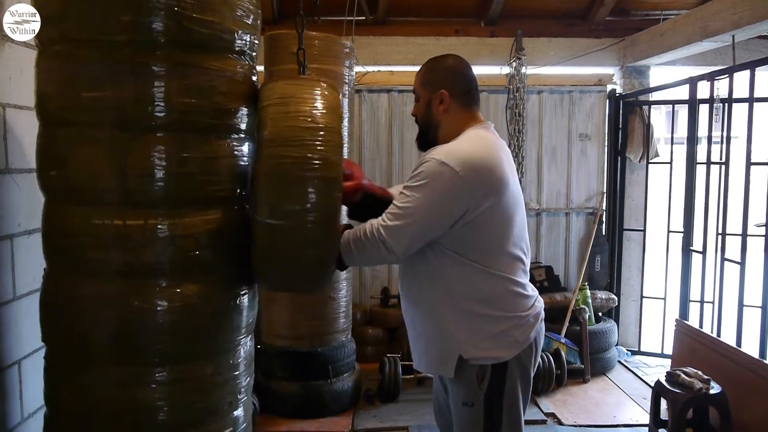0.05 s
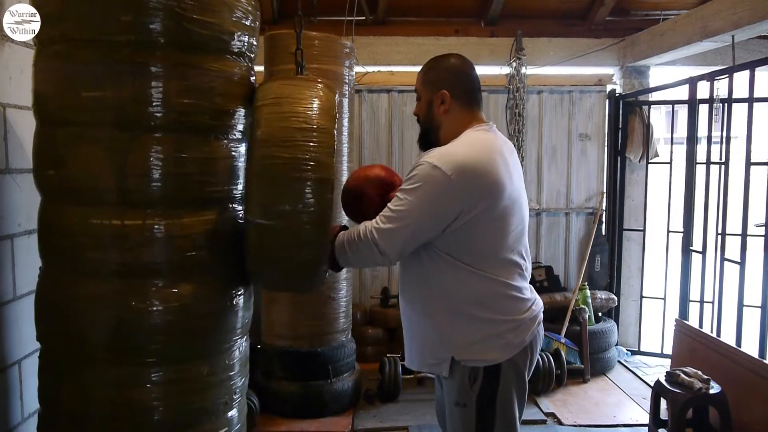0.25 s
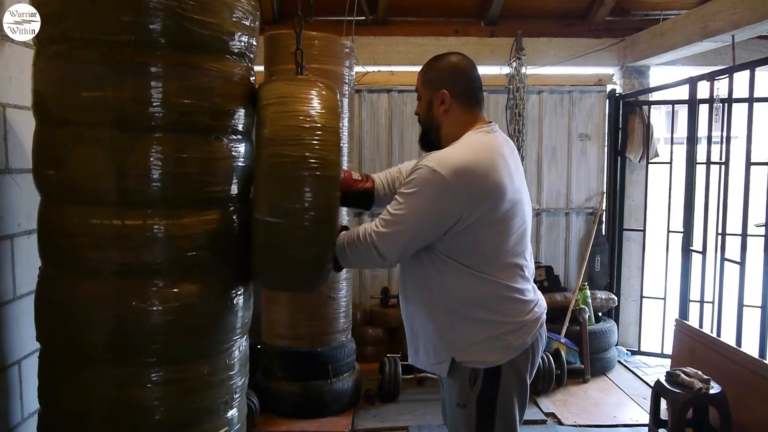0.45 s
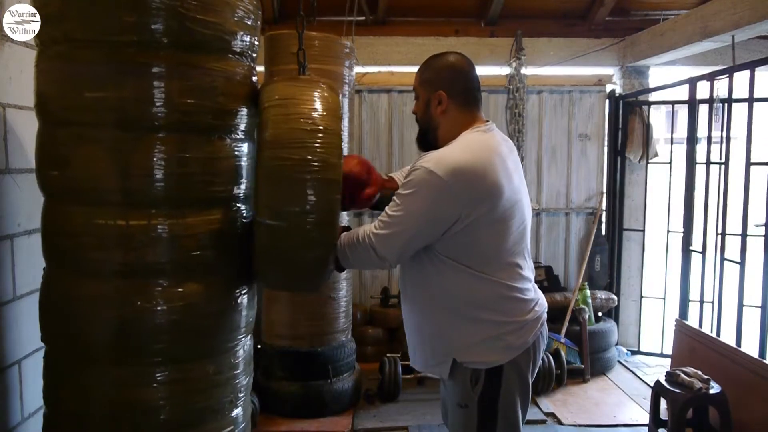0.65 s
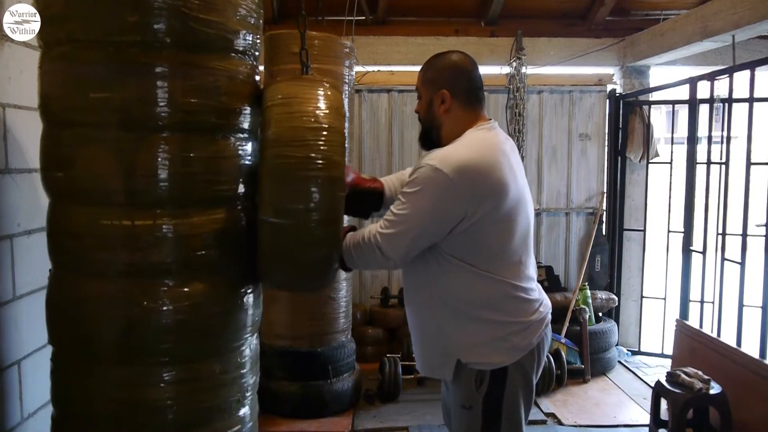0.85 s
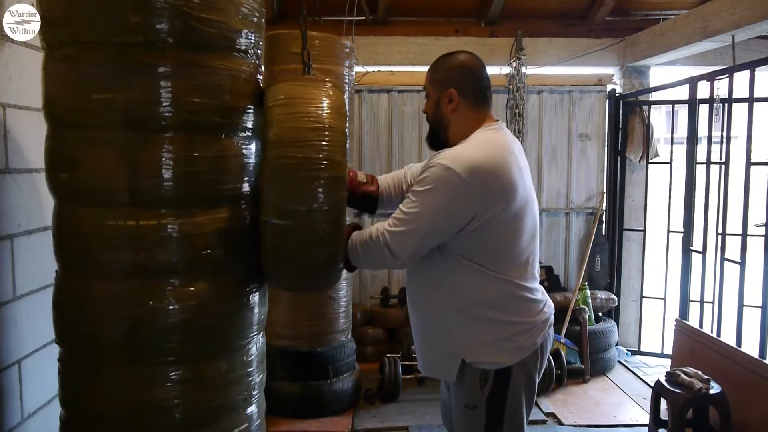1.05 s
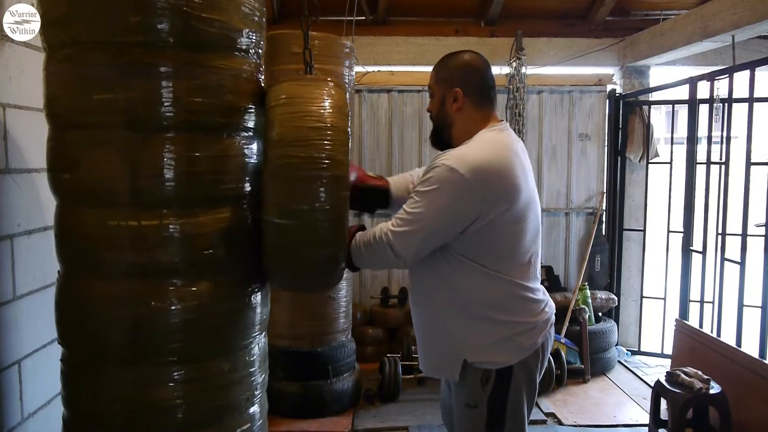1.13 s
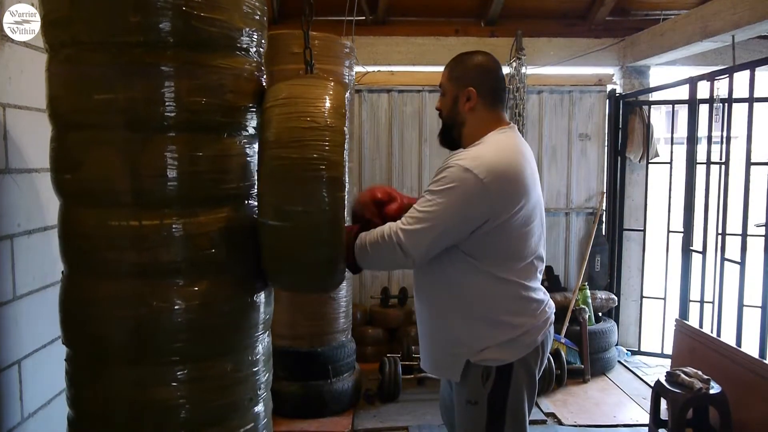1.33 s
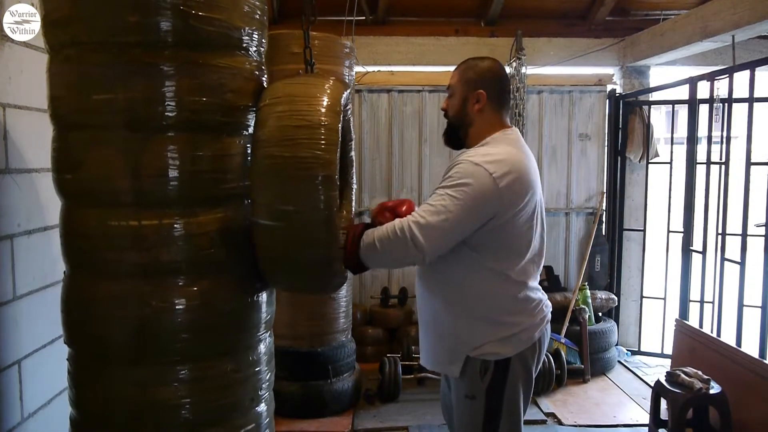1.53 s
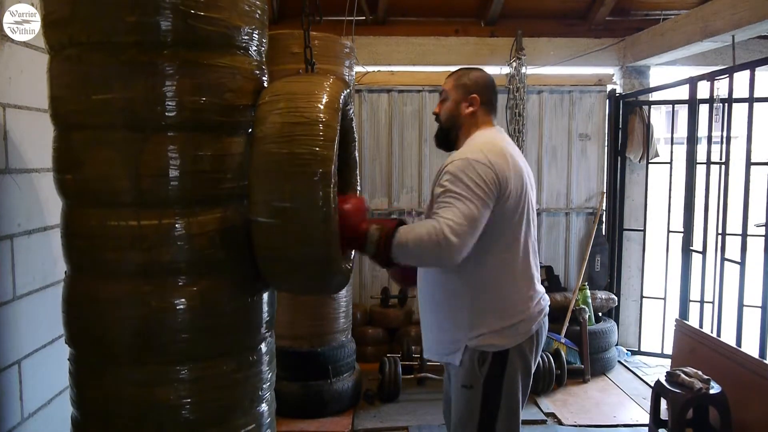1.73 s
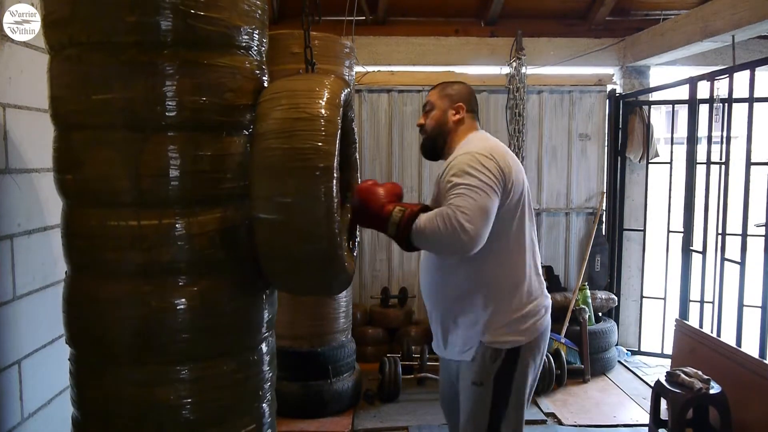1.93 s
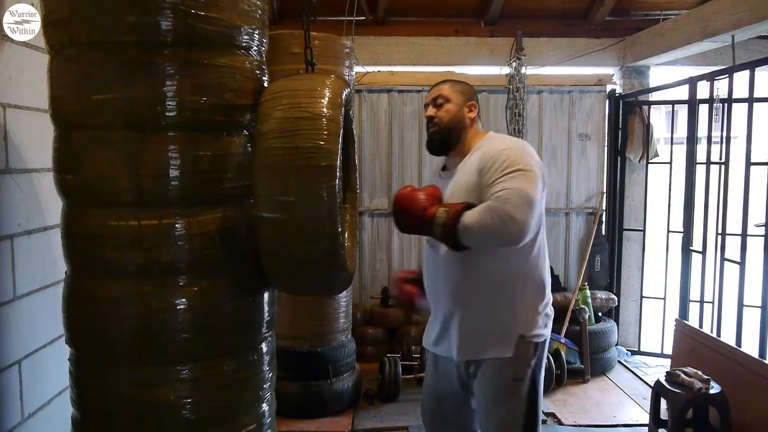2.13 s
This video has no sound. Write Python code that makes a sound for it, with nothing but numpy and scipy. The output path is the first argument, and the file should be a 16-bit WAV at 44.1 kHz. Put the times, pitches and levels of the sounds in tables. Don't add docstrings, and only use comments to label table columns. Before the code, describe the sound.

Gloved punches smack a hanging bag of taped tyres: one hard knock, one boomier thud, then a tight double. Chain and bracket clink just after each, in a reverberant block-walled garage, heard fairly close in stereo.

```python
import sys
import numpy as np
from scipy import signal
from scipy.fft import rfft, irfft
from scipy.io import wavfile
from scipy.ndimage import uniform_filter1d

SR = 44100
rng = np.random.default_rng(int(sys.argv[2]) if len(sys.argv) > 2 else 0)


def volts_from_decibels(level):
    exponent = np.asarray(level, float) / 20
    return 10 ** exponent


def wav_out(sig):
    wavfile.write(sys.argv[1], SR, np.round(np.clip(np.atleast_2d(sig).T, -1, 1) * 32767).astype(np.int16))


N = 97020

# frequency in Hz, density in dB per Hz.
AIR_SPECTRUM = [(25, 3), (100, -3.5), (200, -10.5), (414, 2), (1470, 1.5), (4840, -4), (11500, -14),
                (15500, -32)]
# time in seconds, gain in dB.
AIR_SWELL = [(0, 3), (1.2, -1.5), (1.7, -.5), (2.0, -2), (2.2, -0.6)]
AIR_DB = -37.5

# start in
# seconds, level in dB, length in seconds, centre in Hz, width in octaves.
TAPE_TICKS = [(0.001, -32, 0.041, 5560, 4.5), (0.125, -40, 0.027, 9900, 1.7),
              (0.1744, -28, 0.011, 1390, 1.28), (.1748, -27.5, 0.0078, 8300, 1.17),
              (0.226, -34.5, 0.012, 10700, 0.35), (0.268, -31.5, 0.0089, 1140, 1.24),
              (.3306, -38.5, 0.0074, 6000, 1.9), (0.461, -16, 0.0031, 8200, 0.36),
              (0.763, -24.5, 0.034, 2130, 0.88), (.43, -27, 0.014, 1590, 0.77),
              (1.022, -45, 0.0033, 1200, 1), (0.809, -19.5, 0.005, 5500, 0.22),
              (1.064, -21.5, 0.013, 2880, 0.48), (1.129, -35.5, 0.015, 606, 0.59),
              (0.7056, -33, 0.018, 5000, 1.2), (1.3593, -28, 0.015, 7500, 1.37),
              (1.482, -39.5, 0.0046, 8540, 0.73), (1.541, -43.5, 0.0097, 11000, 0.58),
              (1.585, -41.5, 0.012, 6150, 1.2), (1.6125, -27.5, 0.009, 8600, 1.36),
              (1.747, -37.5, 0.036, 5600, 1.3), (1.8436, -35, 0.034, 8330, 1),
              (1.986, -46.5, 0.014, 12000, 0.51)]
TICK_RISE_S, TICK_T60_S = 0.0021, 0.067

# start in seconds, length in seconds, level in dB, centre in Hz.
BAG_RUBS = [(0.0012, 0.24, -45, 585), (0.001005, 0.12, -40, 1574), (.19, 0.1, -41, 540),
            (1.31, .07, -54, 140), (1.77, 0.092, -40.5, 1650), (1.861, 0.067, -40.5, 804),
            (1.8, .14, -42.5, 1214), (2.12, 0.32, -41.5, 1360), (.405, .035, -51, 166),
            (.74, 0.046, -43.5, 137), (2.0, 0.062, -47.5, 4500), (1.3, 0.25, -50, 5750)]
RUB_OCTAVES = 0.39

# start in seconds, boom level in dB, knock
# level in dB, knock pitch in Hz, crackle level in dB.
PUNCHES = [
    (0.3964, -30, -4.5, 611, -19),
    (0.7295, -10.5, -10, 760, -19),
    (0.9859, -14, -10.5, 612, -21),
    (.9915, -20, -13, 704, -27),
]
# ratio to the knock pitch, level in dB, decay time T60 in seconds.
TYRE_MODES = [(1, 7.5, 0.02), (1.55, -0.5, 0.039), (1.95, 0.5, 0.02), (2.45, -5.5, 0.035),
              (3.2, -10.5, 0.035), (4.2, -17, 0.054)]
# delay in seconds, level in dB.
CONTACTS = [
    (0, 0.5),
    (.0028, -14.5),
    (.0065, -14),
    (.033, -11),
]
KNOCK_RISE_S = 0.0011
BOOM_HZ, BOOM_RISE_S, BOOM_T60_S = 268, 0.0025, 0.016
# frequency in Hz, density in dB per Hz.
TAPE_SPECTRUM = [(88, -26), (150, -25), (383, -0.5), (757, -1), (2640, -5.5), (8180, -6), (12800, -11.5),
                 (15900, -22)]
TAPE_RISE_S, TAPE_HOLD_S, TAPE_T60_S = 0.005, 0.026, 0.5

# start in seconds, level in dB, length in seconds,
# ringing relative to the jolt in dB.
JOLTS = [
    (0.4742, -16, 0.018, -7.5),
    (0.811, -20.5, 0.0098, -18),
    (0.814, -16.5, 0.013, -8),
    (1.062, -16, 0.0085, -9.5),
]
# frequency in Hz, density in dB per Hz.
JOLT_SPECTRUM = [(150, -16), (648, 0.5), (1620, 0.5), (3500, -1), (6500, -4), (9000, -14.5), (12500, -19.5),
                 (15200, -15)]
JOLT_RISE_S, JOLT_T60_S = 0.0034, 0.16
# centre in Hz, level in dB, decay time T60 in seconds,
# spread in Hz.
STEEL_MODES = [(1050, -10, .2, 160), (1612, -4, .3, 70), (1752, -6, .3, 70), (2260, -4, .25, 200),
               (2783, -6, .25, 100), (3215, -6, .25, 80), (3452, -5, .45, 70), (4010, -6, .3, 70),
               (4700, -8, .2, 250), (5392, 0, .3, 160), (6270, -7, .28, 140), (7500, -7, .12, 600)]
# start in seconds, level in dB.
SHIVERS = [
    (0.476, -22.5),
    (0.815, -27.5),
    (1.062, -29.5),
]
# centre in Hz, level in dB, decay time T60 in seconds,
# spread in Hz.
SMALL_LINK_MODES = [(13300, -1, .22, 500), (13950, -2, .16, 500), (14400, -2, .14, 500),
                    (14850, -3, .12, 500)]
SHIVER_RISE_S = 0.0027

# frequency in Hz, decay time T60 in seconds.
GARAGE_T60 = [(200, 0.84), (530, 1), (1390, 0.78), (3680, 0.59), (9700, 0.4), (15000, .4)]
WET_DB, PUNCH_WET_DB, BUILD_S = -4, -11, 0.02
# frequency in Hz, left-right likeness from 0 to 1.
PORT_LIKENESS = [(60, .95), (300, 1), (700, 0.94), (1500, 0.65), (3000, 0.24), (12000, 0.17)]
# frequency in Hz, gain in dB.
MICROPHONE = [(25, -36), (100, -14.5), (200, 1), (400, 0), (15300, 1.5), (16200, -40)]


def evened(x):
    return x / np.sqrt(np.mean(x ** 2) + 1e-20)


def read(points, hz):
    f, value = np.transpose(points)
    return np.interp(np.log(hz + 1), np.log(f + 1), value)


def add(mix, s, sound):
    part = mix[..., max(round(s * SR), 0):][..., :sound.shape[-1]]
    part += sound[..., :part.shape[-1]]


def decay(t, t60):
    return volts_from_decibels(-60 * t / t60)


def coloured(x, db_of):
    hz = abs(np.fft.fftfreq(2048, 1 / SR))
    log_gain = np.log(volts_from_decibels(np.maximum(db_of(hz), -100)))
    taps = np.fft.ifft(np.exp(np.conj(signal.hilbert(log_gain)))).real
    if x.ndim > 1:
        taps = taps[None]
    return signal.oaconvolve(x, taps, axes=-1)[..., :x.shape[-1]]


def bell(centre_hz, octaves):
    return lambda hz: -6 * (np.log2((hz + 1) / centre_hz) / octaves) ** 2


def pair(a, b):
    same = np.clip(read(PORT_LIKENESS, np.fft.rfftfreq(len(a), 1 / SR)), 0, 1)
    mid = rfft(a) * np.sqrt((1 + same) / 2)
    side = rfft(b) * np.sqrt((1 - same) / 2)
    return irfft(np.array([mid + side, mid - side]), len(a))


def snaps(rise, hold, t60, per_s, spread_db):
    t = np.arange(0, 0.4, 1 / SR)
    chance, sign, size = rng.random((3, 2, len(t)))
    sizes = volts_from_decibels(-spread_db * np.log(size + 0.02))
    clicks = (chance < per_s / SR) * np.sign(sign - 0.5) * sizes
    envelope = np.minimum(t / rise, 1) * decay(np.maximum(t - rise - hold, 0), t60)
    return evened(pair(*clicks)), envelope


def rings(families, rise):
    t, out = np.arange(0, 0.4, 1 / SR), 0
    for hz, db, t60, spread_hz in families:
        near, turn = rng.random((2, 2, 16, 1))
        mode_hz = hz + spread_hz * (near - 0.5)
        crowd = evened(np.sin(2 * np.pi * (mode_hz * t + turn)).sum(1))
        out = out + volts_from_decibels(db) * decay(t, t60) * crowd
    return pair(*out) * np.minimum(t / rise, 1)


def air():
    hz, t, z = signal.stft(rng.standard_normal((2, N)), SR, nperseg=1024)
    patches = uniform_filter1d(rng.standard_normal(z.shape[1:]), 14, 0)
    patches = evened(uniform_filter1d(patches, 6, 1))
    swell = np.interp(t, *np.transpose(AIR_SWELL))
    z = z * volts_from_decibels(read(AIR_SPECTRUM, hz)[:, None] + 1.45 * patches + swell)
    noise = signal.istft(z, SR, nperseg=1024)[1][:, :N]
    return volts_from_decibels(AIR_DB) * evened(pair(*noise))


def ticks():
    out = np.zeros((2, N))
    for s, db, hold, hz, octaves in TAPE_TICKS:
        clicks, envelope = snaps(TICK_RISE_S, hold, TICK_T60_S, per_s=12000, spread_db=2.5)
        add(out, s, volts_from_decibels(db) * envelope * evened(coloured(clicks, bell(hz, octaves))))
    return out


def rubs():
    out = np.zeros((2, N))
    for s, length, db, hz in BAG_RUBS:
        slips, _ = snaps(1, 1, 1, per_s=1100, spread_db=0.0)
        t = np.arange(slips.shape[1]) / SR
        arch = np.sin(np.pi * np.minimum(t / length, 1))
        stroke = np.sqrt(np.maximum(arch, 0))
        add(out, s, volts_from_decibels(db) * stroke * evened(coloured(slips, bell(hz, RUB_OCTAVES))))
    return out


def punches():
    out, t = np.zeros((2, N)), np.arange(0, 0.1, 1 / SR)
    boom = np.minimum(t / BOOM_RISE_S, 1) * decay(np.maximum(t - BOOM_RISE_S, 0), BOOM_T60_S)
    boom = boom * np.sin(2 * np.pi * BOOM_HZ * t)
    for s, boom_db, knock_db, knock_hz, tape_db in PUNCHES:
        knock = np.zeros(len(t))
        for ratio, db, t60 in TYRE_MODES:
            knock += volts_from_decibels(db) * decay(t, t60) * np.sin(2 * np.pi * knock_hz * ratio * t)
        knock = knock * np.minimum(t / KNOCK_RISE_S, 1) ** 2
        thud = volts_from_decibels(boom_db) * boom - volts_from_decibels(knock_db) * knock / abs(knock).max()
        for late, db in CONTACTS:
            add(out, s + late, volts_from_decibels(db) * thud)
        clicks, envelope = snaps(TAPE_RISE_S, TAPE_HOLD_S, TAPE_T60_S, per_s=20000, spread_db=1.5)
        crackle = evened(coloured(clicks, lambda hz: read(TAPE_SPECTRUM, hz)))
        add(out, s, volts_from_decibels(tape_db) * envelope * crackle)
    return out


def jolts():
    out = np.zeros((2, N))
    for s, db, hold, ring_db in JOLTS:
        clicks, envelope = snaps(JOLT_RISE_S, hold, JOLT_T60_S, per_s=7000, spread_db=2.5)
        knocks = evened(coloured(clicks, lambda hz: read(JOLT_SPECTRUM, hz)))
        add(out, s, volts_from_decibels(db) * envelope * knocks)
        add(out, s, volts_from_decibels(db + ring_db) * rings(STEEL_MODES, hold))
    for s, db in SHIVERS:
        add(out, s, volts_from_decibels(db) * rings(SMALL_LINK_MODES, SHIVER_RISE_S))
    return out


def garage(x, wet_db):
    taps = np.zeros((2, SR))
    slots = np.arange(100, SR - 10, 10)
    at = slots + rng.integers(0, 10, (2, len(slots)))
    np.put_along_axis(taps, at, rng.choice([-1., 1.], (2, len(slots))), 1)
    hz, t, z = signal.stft(taps, SR, nperseg=256)
    z = z * decay(t, read(GARAGE_T60, hz)[:, None])
    tail = signal.istft(z, SR, nperseg=256)[1][:, :SR]
    build = np.minimum(np.arange(SR) / SR / BUILD_S, 1)
    tail = pair(*(tail * build))
    tail = volts_from_decibels(wet_db) * tail / np.linalg.norm(tail[0])
    return x + signal.fftconvolve(x[:1], tail, axes=1)[:, :N]


def scene():
    near = garage(ticks() + rubs(), WET_DB) + garage(punches(), PUNCH_WET_DB) + garage(jolts(), WET_DB)
    heard = coloured(air() + near, lambda hz: read(MICROPHONE, hz))
    return heard * volts_from_decibels(np.array([[-0.3], [0.3]]))


def low_pass(x):
    return signal.sosfilt(signal.butter(12, 16020, fs=SR, output="sos"), x)


def record(dry):
    over = np.maximum(abs(dry) - 0.75, 0)
    held = dry - np.sign(dry) * (over - 0.2 * np.tanh(over / 0.2))
    return low_pass(held)


dry = scene()
out = record(dry)
wav_out(out)
```